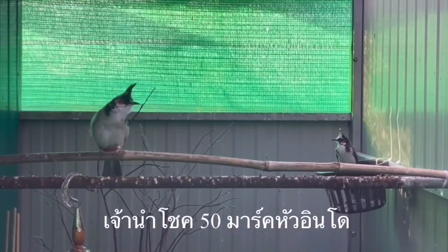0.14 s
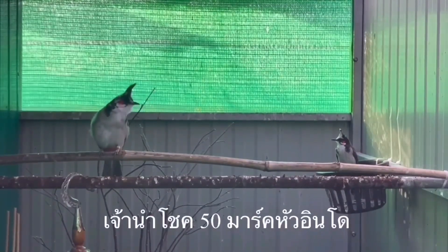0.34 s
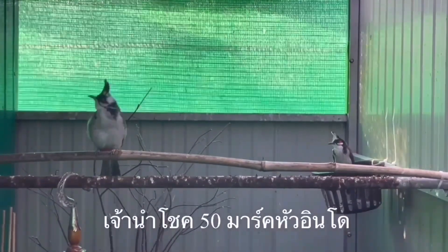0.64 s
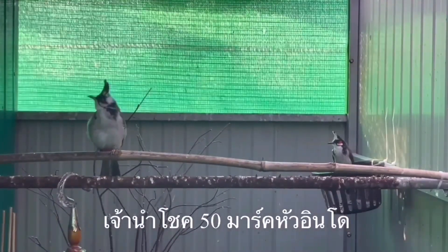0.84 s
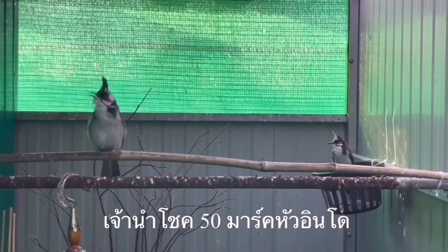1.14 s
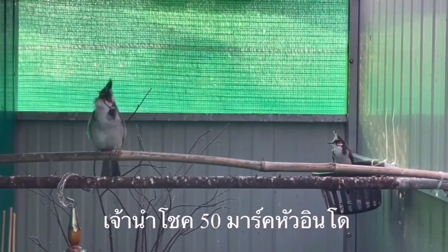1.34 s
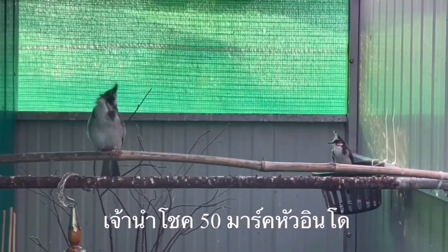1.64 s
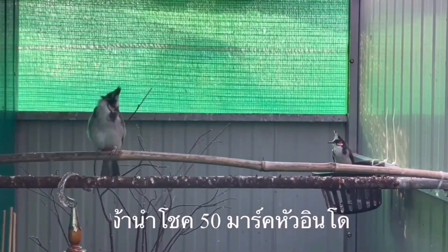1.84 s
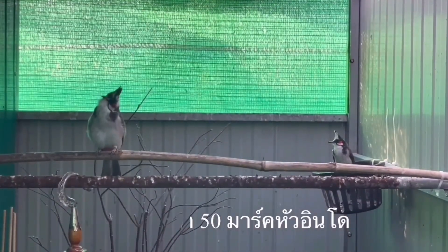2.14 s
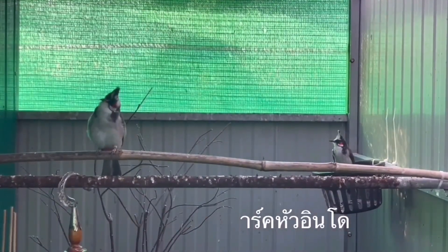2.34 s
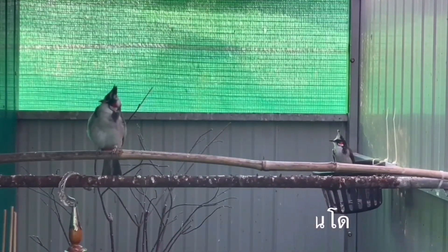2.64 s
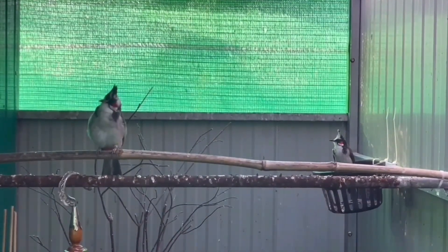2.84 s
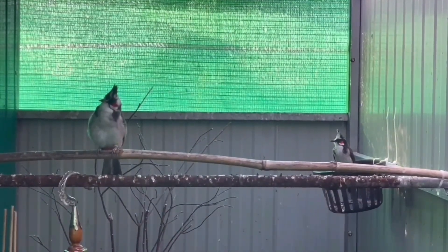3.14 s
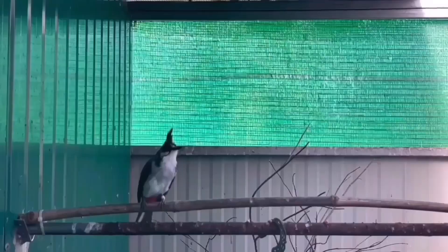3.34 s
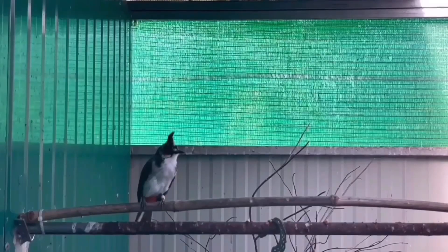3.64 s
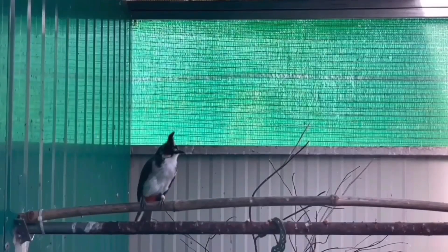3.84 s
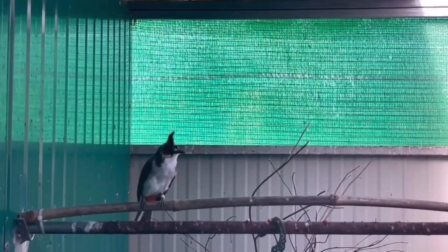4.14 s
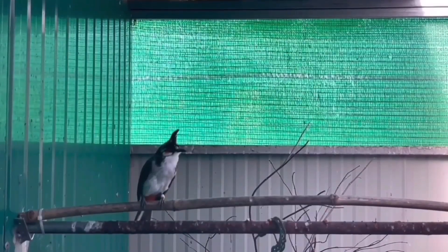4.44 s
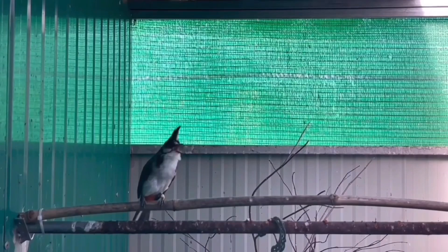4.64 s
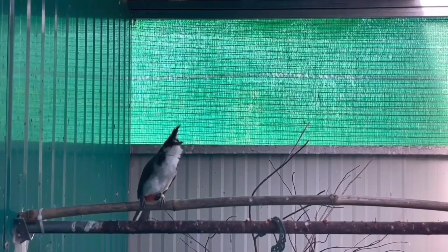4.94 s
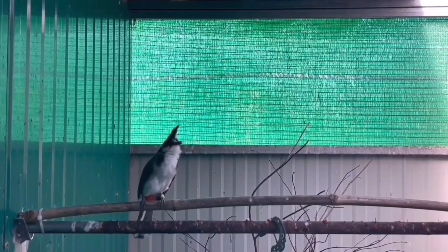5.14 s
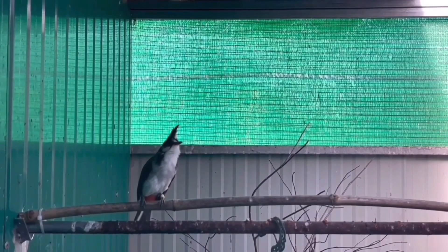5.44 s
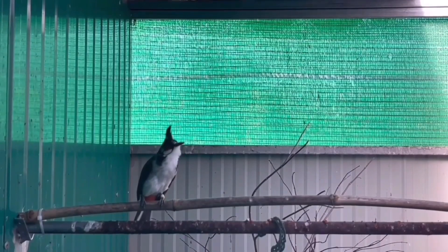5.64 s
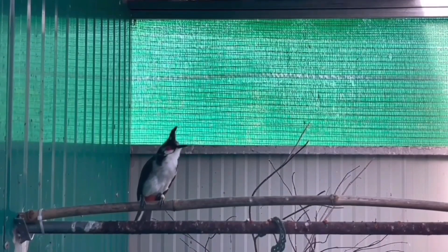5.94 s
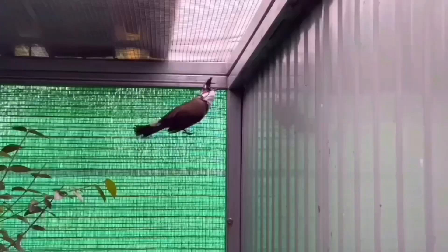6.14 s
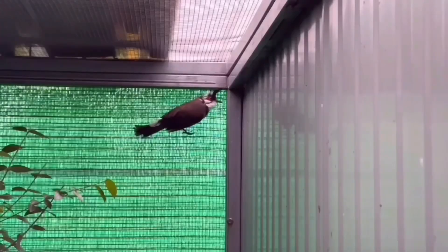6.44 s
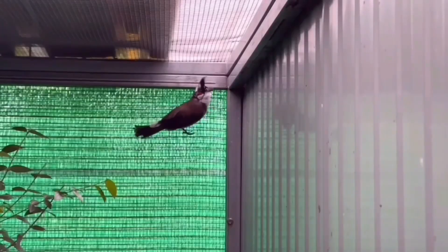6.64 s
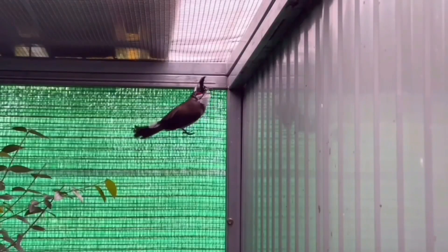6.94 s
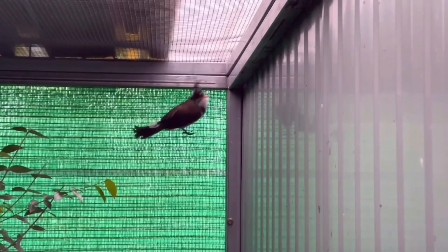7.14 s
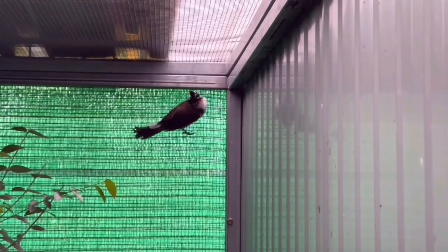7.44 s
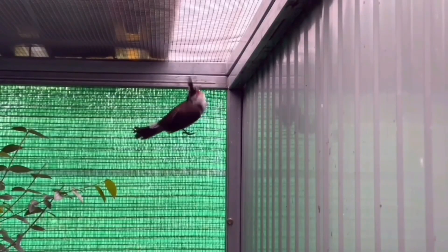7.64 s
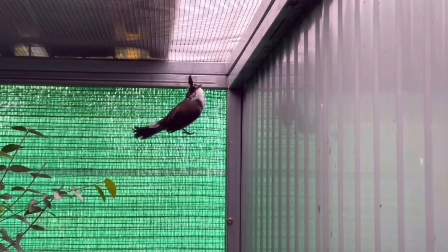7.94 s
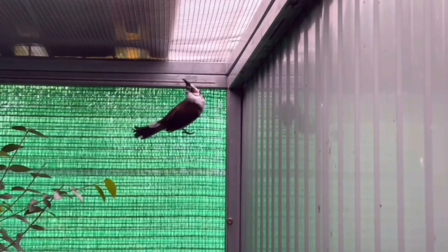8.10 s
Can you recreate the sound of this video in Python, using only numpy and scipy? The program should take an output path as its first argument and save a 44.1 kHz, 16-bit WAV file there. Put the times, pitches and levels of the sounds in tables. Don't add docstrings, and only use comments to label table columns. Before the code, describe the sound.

In a sheet-walled aviary, faint echoing chirps over low town rumble dip into a new scene, where a close bird whistles a short bouncy phrase. Hoarse distant scolding follows. Another quick near phrase bursts out, then a brief wing flutter. After a last fade, louder background rumble carries a piercing trilled song that overloads the microphone, then two harsh notes and faint breathy calls.

```python
import sys
import numpy as np
from scipy import signal
from scipy.fft import rfft, irfft, next_fast_len
from scipy.io import wavfile
from scipy.ndimage import uniform_filter1d

SR = 44100
rng = np.random.default_rng(int(sys.argv[2]) if len(sys.argv) > 2 else 0)


def level_to_linear(level):
    exponent = np.asarray(level, float) / 20
    return 10 ** exponent


def persist_wave(psi):
    counts = np.round(np.clip(psi, -1, 1) * 32767).astype(np.int16)
    wavfile.write(sys.argv[1], SR, np.atleast_2d(counts).T)


N = 364707

SCOOP = dict(bend=3.6, attack=.3, swell_db=-12, fade_db=-0.5)
TRILLED_SCOOP = dict(bend=3.5, attack=.6, swell_db=-26.5, fade_db=-3.5)
CLIMB = dict(bend=1.1, attack=0.41, swell_db=-28, fade_db=-9)
SINK = dict(bend=1.8, attack=0.11, swell_db=-4, fade_db=-3.5)
STROKE = dict(bend=1.2, attack=0.35, swell_db=-10, fade_db=-1)
DROP = dict(bend=4.5, attack=.6, swell_db=-2.5, fade_db=-1)
SQUEAK_SHAPE = dict(bend=.9, attack=0.12, swell_db=-3, fade_db=-9)
FAR_NOTE = dict(bend=1.1, attack=.05, swell_db=1, fade_db=-13.5)
BLURRED_NOTE = dict(bend=1.5, attack=.2, swell_db=-3.5, fade_db=-5)

SCOOP_ROWS = [
    (1.714, 0.039, 1314, 2100, -16),
    (4.935, .012, 1900, 2518, -14),
    (4.951, .021, 3745, 4096, -8.5),
    (5.034, .022, 1399, 1950, -17),
    (6.8, .14, 1300, 1756, -15),
    (7.08, .04, 1382, 2117, -1),
]
TRILLED_SCOOP_ROWS = [
    (1.194, 0.056, 1750, 2792, -3.5),
    (4.68, .036, 1497, 2800, 2),
]
CLIMB_ROWS = [
    (1.365, 0.068, 1804, 3817, 4),
    (4.714, 0.014, 2872, 3696, 1),
]
SINK_ROWS = [
    (1.607, .053, 2781, 2605, 0),
    (1.802, 0.047, 2154, 2121, -15.5),
    (5.099, .029, 3403, 2766, 0),
    (5.14, .072, 2390, 1710, -17),
    (7.003, .044, 2968, 2750, 5),
]
STROKE_ROWS = [
    (5.056, .03, 2800, 3153, -3),
    (5.085, .014, 3146, 3500, -1),
    (7.122, .012, 2950, 3277, 9),
]
DROP_ROWS = [
    (1.746, .054, 2943, 2396, -8),
    (4.869, 0.0095, 4362, 2700, -3),
    (7.114, .009, 4104, 2966, 4),
    (7.132, .085, 4350, 3520, 9),
    (7.216, .056, 3403, 2609, 4.5),
]
DUET_ROWS = [
    (4.876, .047, 2680, 2290, 0),
    (4.875, .028, 3800, 3050, -9),
]
# [t/s, f/Hz, effort/dB]
WARBLE_PATH = [
    (6.69, 2115, -36.5),
    (6.703, 2201, -23.5),
    (6.71, 2250, 0.5),
    (6.74, 2448, 7),
    (6.765, 3220, 9.5),
    (6.779, 3718, 10.5),
    (6.8, 3790, 1.5),
    (6.82, 3787, -8),
]
# [t/s, f/Hz, effort/dB]
HARSH_NOTES = [
    [(7.338, 1439, -15), (7.348, 2020, -15), (7.4, 2066, -12.5), (7.44, 2058, -10.5), (7.48, 1900, -18),
     (7.51, 1580, -14)],
    [(7.638, 1900, -20), (7.65, 2164, -15.5), (7.665, 2582, -7), (7.718, 2800, -3.5), (7.73, 3686, 9.5),
     (7.76, 3884, -1), (7.79, 3870, -4.5)],
]

# [f/Hz, level/dB]
FEATHER_COLOUR = [(300, 2.5), (1000, 1.5), (3000, -7.5), (6000, -5.5), (9000, -4.5), (14000, -27)]

FAR_ROWS = [(.135, 0.013, 1570, 1620, -40), (.165, 0.061, 1812, 1704, -41), (.215, 0.018, 3620, 2410, -43),
            (.245, 0.032, 2365, 2245, -38), (.32, 0.075, 1786, 1746, -51), (2.638, .012, 3000, 3300, -47),
            (2.65, .012, 4150, 4400, -46), (2.693, .015, 2200, 2600, -47), (2.708, .02, 3250, 3450, -46),
            (2.86, .03, 2760, 2280, -52), (6.3, .03, 2890, 4142, -49), (6.37, 0.18, 3742, 3950, -54),
            (6.55, 0.1, 3960, 3990, -39.5), (6.555, 0.039, 2354, 2520, -48),
            (6.555, 0.042, 3155, 3227, -49), (6.555, .045, 4660, 4630, -56)]
# [t/s, nominal length/s, top/Hz, start/Hz, effort/dB]
SCOLD_ROWS = [
    (3.43, 0.08, 4350, 3696, -49),
    (3.534, 0.075, 4220, 2334, -47),
    (3.817, 0.075, 4270, 2580, -46),
    (3.966, 0.09, 4180, 2270, -46),
    (4.286, 0.11, 4170, 2460, -48),
    (4.434, 0.091, 4098, 2390, -48),
    (5.387, 0.05, 4570, 3070, -43),
    (5.55, 0.077, 4180, 3000, -47.5),
    (5.917, 0.082, 4400, 2800, -46.5),
    (6.061, 0.052, 4100, 2450, -45),
]
BLURRED_ROWS = [(.12, 0.033, 2310, 2080, -48), (2.92, 0.12, 3880, 3700, -58),
                (3.05, 0.058, 3010, 2760, -53), (3.15, .12, 3290, 2700, -49.5), (5.3, .07, 2267, 2570, -30),
                (5.42, 0.14, 1780, 2003, -39.5), (5.55, 0.0934, 1990, 1790, -40.5),
                (5.44, .06, 2210, 2829, -34), (5.5, 0.17, 2825, 2273, -31.5),
                (5.86, 0.064, 3200, 3050, -49), (5.87, 0.088, 1853, 1867, -50.5),
                (6.3, 0.089, 1770, 1880, -38)]
LAST_CALL_ROWS = [
    (8.125, .03, 1440, 2100, -33),
    (8.15, .045, 2050, 2400, -35),
    (8.19, .07, 2400, 1910, -46),
]
HELD_ROWS = [
    (.7, .45, 2720, 2700, -53),
    (.88, .15, 1120, 1110, -50),
]

# [f/Hz, t60/s]
WALL_T60 = [(500, 0.66), (2000, 0.43), (3000, 0.36), (5000, 0.37), (11000, 0.35)]
# [f/Hz, level/dB]
ECHO_WIDTH = [(300, -4.5), (1500, -1.5), (2500, -22), (4500, -23), (5500, -37.5)]

# [f/Hz, level per Hz/dB]
RUMBLE_1 = [(15, -38), (25, -8), (70, 3), (107, -5), (208, 3), (253, -13), (324, -10), (446, -15.5),
            (599, -14.5), (1860, -30), (2380, -35), (9000, -35.5), (11700, -60), (19800, -120)]
RUMBLE_2 = [(15, -41.5), (25, -2.5), (54, 0.5), (90, -7), (137, -5), (229, -8.5), (332, -19), (530, -19.5),
            (1140, -26), (1490, -31.5), (2380, -34), (4630, -42), (9000, -42), (11700, -66), (19800, -120)]
RUMBLE_3 = [(15, -25), (25, -0.5), (82, -4), (349, -21.5), (805, -28), (1080, -33.5), (1220, -34),
            (1490, -39), (1950, -41.5), (3200, -40), (3900, -41.5), (4980, -48.5), (9000, -52.5),
            (11700, -81), (19800, -120)]
RUMBLE_4 = [(15, -26.5), (25, -3), (70, 4.5), (144, -10), (247, -8), (357, -18), (1030, -30), (1190, -33.5),
            (1860, -41.5), (2440, -46.5), (3800, -39.5), (4740, -55.5), (9000, -58.5), (11700, -91),
            (19800, -120)]
# [f/Hz, level/dB]
RUMBLE_EDGES = [(28, -12.5), (40, -6.5), (56, 7), (77, -6), (97, 1.5), (125, -2), (9000, 3), (11500, -13),
                (12500, -18.5)]
# [f/Hz, likeness 0..1]
AIR_LIKENESS = [(60, 0.987), (150, 0.98), (380, 0.68), (950, 0.53), (1700, 0.2), (2400, 1), (4000, 0.83)]

SCENE_CHANGES = [.66, 3.38, 6.21]
# [out start/s, out end/s, in start/s, in end/s]
SCENE_FADES = [
    (.5, .66, .661, .82),
    (3.33, 3.352, 3.4, 3.58),
    (6.09, 6.21, 6.211, 6.36),
]
# [f/Hz, level/dB]
CAPSULE_RESPONSE = [(8000, -1), (9600, 4.5), (10400, 9.5), (11400, 13.5), (12200, 4.5), (12800, -23.5),
                    (16000, -37)]
# [f/Hz, left lead/rad]
PORT_LEAD = [(1700, 0), (3100, .5), (3800, .5), (5200, 0), (8500, .2), (9300, 1.6), (9900, 3.05),
             (10350, 3.2), (10700, 2.3), (11400, 1.), (12100, 0)]


def evened(x):
    return x / np.sqrt(np.mean(x ** 2) + 1e-20)


def read(points, hz):
    f, value = np.transpose(points)
    return np.interp(np.log(hz + 1), np.log(f + 1), value)


def add(mix, s, sound):
    part = mix[round(s * SR):][:len(sound)]
    part += sound[:len(part)]


def wobble(count, hz):
    return evened(signal.lfilter(*signal.butter(2, hz, fs=SR), rng.standard_normal(count)))


def songs():
    whistles = glide(SCOOP_ROWS, **SCOOP) + glide(CLIMB_ROWS, **CLIMB) + glide(DROP_ROWS, **DROP)
    whistles += glide(STROKE_ROWS, **STROKE) + glide(SINK_ROWS, **SINK)
    clear = sing(whistles, rasp=.06, octave_db=-38)
    stepped = glide([(6.958, .045, 1500, 2950, 8)], **STROKE)
    clear += sing(stepped, rasp=.1, trill=.06, trill_hz=58.17, third_db=-40)

    trilled = sing(glide(TRILLED_SCOOP_ROWS, **TRILLED_SCOOP), trill=0.11, trill_hz=201, octave_db=-28.0)
    warble = [(s, hz, db, .2 * (2306 / hz) ** 4) for s, hz, db in WARBLE_PATH]
    trilled += sing([warble], "trill", trill_hz=125.3, octave_db=-26.0)

    low, high = glide(DUET_ROWS, **SINK)
    duet = sing([low], trill=0.018, trill_hz=119.3, octave_db=-23.5)
    duet += sing([high], rasp=.3, trill=.08, trill_hz=110.3)

    upstroke = glide([(1.488, 0.0289, 2800, 5100, -9)], **SQUEAK_SHAPE)
    squeak = sing(upstroke, beak_hz=1900, rasp=.15, octave_db=-23.5, breath_db=-19.5,
                  third_db=-20.5, fourth_db=-19.5)

    voice = "octave_db", "breath_db", "rasp"
    rattle = sing(harsh(HARSH_NOTES[0], 9, .38, 4.2), *voice, beak_hz=1900, halves=1.4,
                  third_db=-13, fourth_db=-21.0)
    burst = sing(harsh(HARSH_NOTES[1], 4, .5, -.3), *voice, beak_hz=1900, halves=.3,
                 third_db=-18.5, fourth_db=-20.0)
    return clear + trilled + duet + squeak + rattle + burst


def glide(rows, bend, attack, swell_db, fade_db):
    u = np.linspace(0, 1, num=16)
    shape = swell_db * np.clip(1 - u / attack, 0, 1) + fade_db * u ** 2
    ease = (1 - u) ** bend
    return [np.transpose([s + length * u, end + (start - end) * ease, db + shape])
            for s, length, start, end, db in rows]


def harsh(rows, octave_db, rasp, rasp_per_s):
    s, hz, db = np.transpose(rows)
    khz = np.maximum(hz - 2750, 0) / 1000
    octave = octave_db - 16.5 * khz
    hiss = -4.5 - 13.5 * khz
    return [np.transpose([s, hz, db, octave, hiss, rasp + rasp_per_s * (s - s[0])])]


def sing(notes, *names, beak_hz=1250, **voice):
    track = np.zeros(N)
    for rows in notes:
        s, *columns = np.transpose(rows)
        t = np.arange(s[0], s[-1], 1 / SR)
        hz, effort_db, *more = (np.interp(t, s, c) for c in columns)
        add(track, s[0], syrinx(t, hz, effort_db, **dict(zip(names, more)), **voice))
    return signal.sosfilt(signal.butter(4, beak_hz, "high", fs=SR, output="sos"), track)


def syrinx(t, hz, effort_db, octave_db=-33, rasp=0, trill=0, trill_hz=0, halves=0,
           third_db=-33, fourth_db=-38, breath_db=-39):
    rasp = np.clip(rasp, 0, 1)
    swing = np.cos(2 * np.pi * np.cumsum(trill_hz * (1 + .15 * wobble(len(t), 60))) / SR)
    shake = .018 * wobble(len(t), 250) + 0.14 * rasp * wobble(len(t), 600)
    turns = 2 * np.pi * np.cumsum(hz * (1 + shake + trill * swing)) / SR
    tone = np.sin(turns) + level_to_linear(octave_db) * np.sin(2 * turns)
    tone += level_to_linear(third_db) * np.sin(3 * turns)
    tone += level_to_linear(fourth_db) * (np.sin(4 * turns) + 0.99 * np.sin(5 * turns))
    tone *= 1 + halves * rasp * np.cos(turns / 2)
    tone *= 1 + 3.4 * trill * swing + 0.21 * wobble(len(t), 130)
    hiss = level_to_linear(breath_db) * signal.lfilter([1, -.5], 1, rng.standard_normal(len(t)))
    edge = np.clip(np.minimum(t - t[0], t[-1] - t) / 0.0027, 0, 1)
    return level_to_linear(effort_db) * (tone + hiss) * edge


def wings():
    start_s, rise_s, end_s = 5.81, 0.053, 6.12
    t = np.arange(N) / SR
    size = next_fast_len(N)
    colour = level_to_linear(read(FEATHER_COLOUR, np.fft.rfftfreq(size, 1 / SR)))
    hiss = evened(irfft(rfft(rng.standard_normal(size)) * colour, size)[:N])
    since = t - start_s - rise_s
    swell_db = 4.5 * np.minimum(since, 0) / rise_s
    fade_db = -130 * np.maximum(since, 0)
    level = level_to_linear(-49 + fade_db + swell_db) * ((t > start_s) & (t < end_s))
    return hiss * level * (1 + 0.29 * np.cos(2 * np.pi * 21 * (t - start_s)))


def far_birds():
    far = sing(glide(FAR_ROWS, **FAR_NOTE), rasp=0.07, breath_db=-27) + scolding()
    far += sing(glide(BLURRED_ROWS, **BLURRED_NOTE), rasp=0.34, trill=0.045, trill_hz=69.65, breath_db=-33)
    far += sing(glide(LAST_CALL_ROWS, **BLURRED_NOTE), rasp=.3, trill=.04, trill_hz=70, breath_db=-23)
    return far + sing(glide(HELD_ROWS, **BLURRED_NOTE), breath_db=-35)


def scolding():
    snap_s = .016
    notes = [[(s, low, db - 1.5),
              (s + snap_s, .96 * top, db),
              (s + 0.32 * length, .92 * top, db - 1.5),
              (s + 1.6 * length, .76 * top, db - 11.5)]
             for s, length, top, low, db in SCOLD_ROWS]
    return sing(notes, rasp=.3, trill=0.085, trill_hz=91.2, octave_db=-41.5,
                third_db=-57, fourth_db=-51.5, breath_db=-42)


def walls(x, direct_db, early_db, stretch):
    taps = np.zeros((2, SR))
    at = np.arange(60, SR - 20, 20) + rng.integers(0, 20, (2, (SR - 61) // 20))
    np.put_along_axis(taps, at, rng.choice([-1., 1.], at.shape), 1)
    taps *= 1 + level_to_linear(early_db) * np.exp(-np.arange(SR) / (0.013 * SR))
    hz, t, z = signal.stft(taps, SR, nperseg=256)
    z[1] *= level_to_linear(read(ECHO_WIDTH, hz))[:, None]
    decay = level_to_linear(-60 * t / (stretch * read(WALL_T60, hz))[:, None])
    mid, side = signal.istft(z * decay, SR, nperseg=256)[1]
    tail = np.array([mid + side, mid - side]) / np.linalg.norm(mid)
    tail[:, 0] += level_to_linear(direct_db)
    return signal.fftconvolve(x[None], tail[:, :SR * 2 // 3], axes=1)[:, :N]


def air():
    frames, hz = N // 512 + 5, np.fft.rfftfreq(2048, 1 / SR)
    a, b, c, d, patches = rng.standard_normal((frames, 1025, 5)).T
    patches = evened(uniform_filter1d(uniform_filter1d(patches, 10, 0), 8, 1))
    scenes = [(RUMBLE_1, -41), (RUMBLE_2, -41.5), (RUMBLE_3, -42.5), (RUMBLE_4, -27.5)]
    edges = read(RUMBLE_EDGES, hz)
    colours = np.array([evened(level_to_linear(read(f[:-2], hz) + edges)) * level_to_linear(db) for f, db in scenes])
    colour = colours[np.searchsorted(SCENE_CHANGES, np.arange(frames) * 512 / SR)].T
    same = np.clip(read(AIR_LIKENESS, hz), -1, 1)[:, None]
    left = a + 1j * b
    right = same * left + np.sqrt(1 - same ** 2) * (c + 1j * d)
    z = np.array([left, right]) * colour * level_to_linear(1.8 * patches)
    unit = np.std(signal.istft(left, nperseg=2048, noverlap=1536)[1])
    return signal.istft(z, nperseg=2048, noverlap=1536)[1][:, :N] / unit


def scene():
    near = walls(level_to_linear(2.5) * (songs() + wings()), direct_db=-1, early_db=0.7, stretch=0.81)
    far = walls(far_birds(), direct_db=-14, early_db=-3.5, stretch=0.88)
    return near + far + air()


def top_cut(x):
    return signal.sosfilt(signal.butter(12, 15900, fs=SR, output="sos"), x)


def record(dry):
    size = next_fast_len(N)
    hz = np.fft.rfftfreq(size, 1 / SR)
    lead = np.exp(.5j * read(PORT_LEAD, hz))
    response = level_to_linear(read(CAPSULE_RESPONSE, hz)) * np.array([lead, 1 / lead])
    x = irfft(rfft(dry, size) * response, size)[:, :N]

    power_db = 10 * np.log10(abs(uniform_filter1d((x ** 2).mean(0), 400)) + 1e-12)
    fall = np.arange(N) * 60. / SR
    held_db = np.maximum.accumulate(power_db + fall) - fall
    over_db = np.maximum(held_db + 26, 0)
    x = level_to_linear(1.0) * x / level_to_linear(0.17 * uniform_filter1d(over_db, 400))
    x = np.clip(x, -.96, .96)
    for times in SCENE_FADES:
        x = x * np.interp(np.arange(N) / SR, times, [1, 0, 0, 1]) ** 1.4
    return top_cut(x)


dry = scene()
out = record(dry)
persist_wave(out)
```